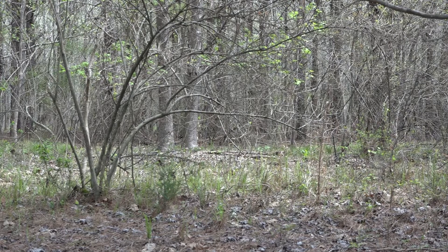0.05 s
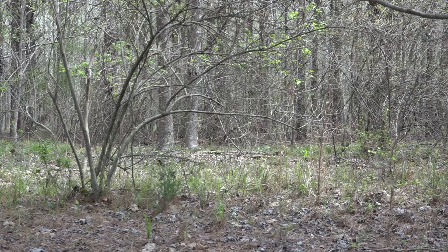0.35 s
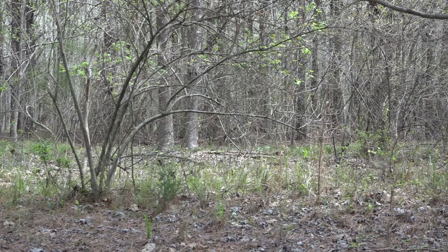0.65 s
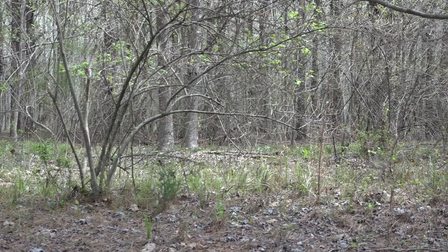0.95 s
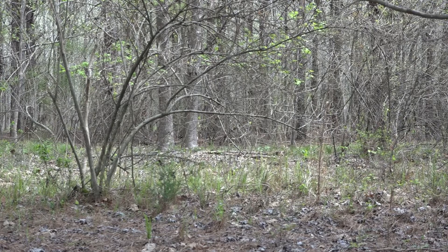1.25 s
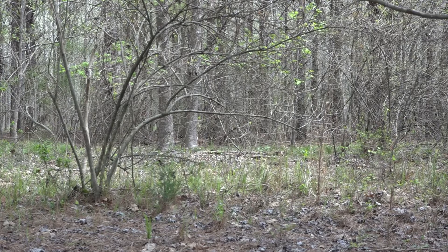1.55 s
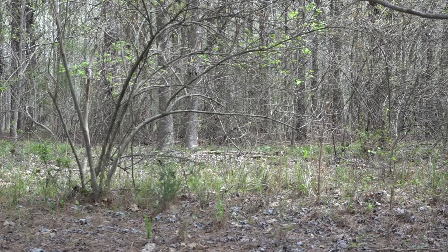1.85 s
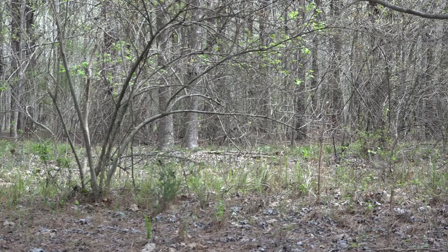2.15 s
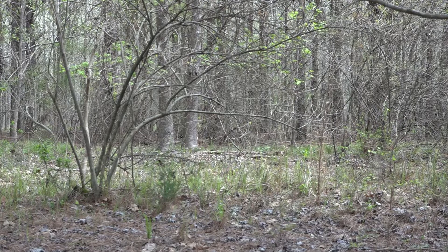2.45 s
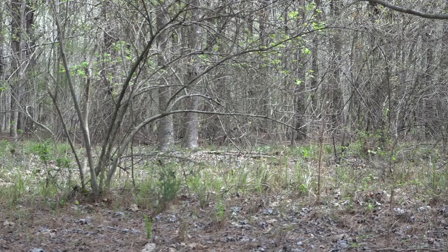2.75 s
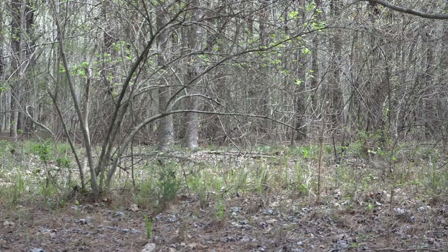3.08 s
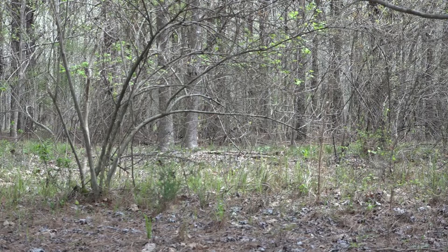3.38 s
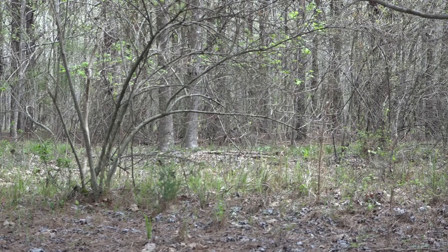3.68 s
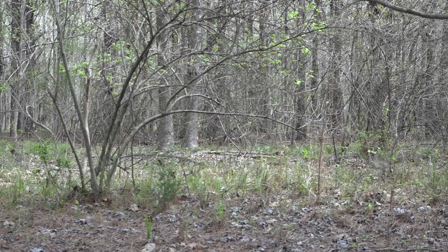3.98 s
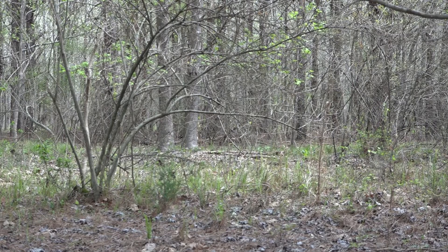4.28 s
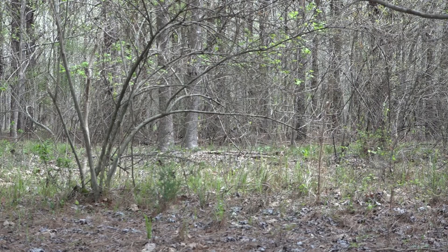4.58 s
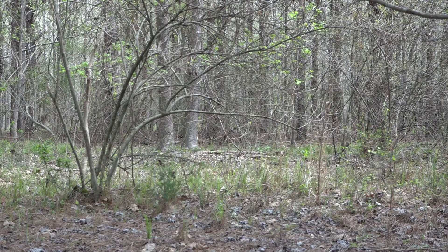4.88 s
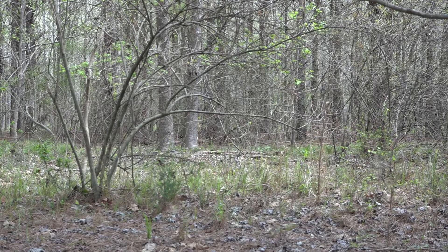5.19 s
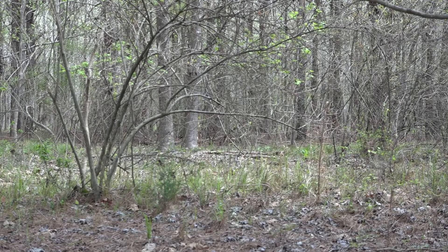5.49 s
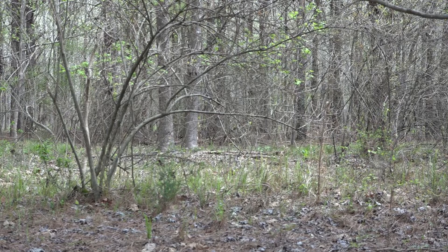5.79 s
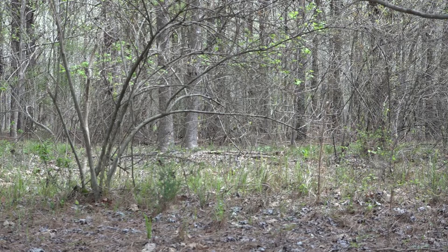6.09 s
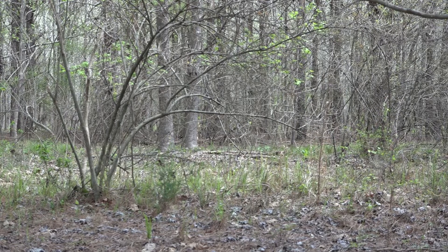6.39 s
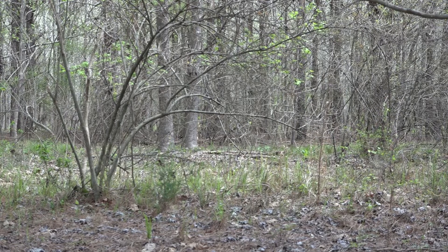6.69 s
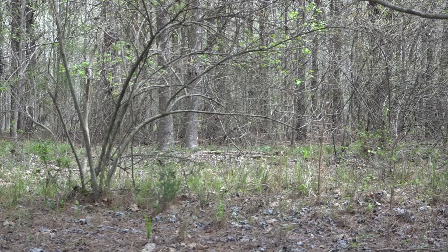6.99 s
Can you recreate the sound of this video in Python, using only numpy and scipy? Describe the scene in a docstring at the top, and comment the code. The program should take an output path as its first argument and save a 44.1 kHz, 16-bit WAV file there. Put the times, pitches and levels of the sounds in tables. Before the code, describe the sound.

In quiet woods with a soft, steady low rumble, a slowing run of seven loud turkey clucks sounds nearby, over faint nasal bird notes and small high chirps. The clucks stop and only distant whistles remain. Then soft steps in dry leaf litter build into crisp rustling and snapping, much quieter than the turkey, joined by a faint two-note bird call repeated four times.

```python
"""A wild turkey close by in spring woods opens with a slowing run of seven sharp clucks, each a quick
dip in syrinx pitch shaped by throat and beak. Behind it a bird whines thinly and songbirds slur, chip
and whistle; the trunks scatter the calls. Later dry leaves rustle and crackle more and more as something
walks through them, and a far bird repeats two notes. Distant air rumbles low throughout."""
import sys
import numpy as np
from scipy import signal
from scipy.fft import rfft, irfft
from scipy.io import wavfile
from scipy.ndimage import uniform_filter1d

SR = 44100
rng = np.random.default_rng(int(sys.argv[2]) if len(sys.argv) > 2 else 0)


def to_wav(sig):
    """Store sig (one row per channel, or 1-D mono) as 16-bit WAV at the path in sys.argv[1].

    Samples outside -1..1 are clipped; the rate is SR.
    """
    pcm = np.clip(np.atleast_2d(sig), -1, 1) * 32767
    pcm = np.round(pcm).astype(np.int16)
    wavfile.write(sys.argv[1], SR, pcm.T)  # frames by channels


N = 319284
TIME_S = np.arange(N) / SR
TOP_HZ = 16100

# (time [s], length [s], lowest pitch [Hz], level [dB], gain of all harmonics but the 2nd [dB], rasp [0-1])
TURKEY_CLUCKS = [(0.175, 0.036, 857, -35, -0.5, 0.13), (0.3967, 0.04, 721.4, -26, 3, 0.33),
                 (0.6739, 0.04, 644.4, -26.5, 2, 0.55), (1.02, .0436, 671, -26, 3, 0.4),
                 (1.451, .0417, 643.4, -23.5, 3, 0.46), (1.9577, 0.041, 643, -23, 2, 0.38),
                 (2.5753, 0.042, 670, -24, 3.5, 0.9)]
# throat and beak response: (frequency [Hz], gain [dB])
THROAT_EQ = [(300, -53), (520, -25), (680, -12.5), (860, -16.5), (1060, -4), (1350, -6), (1520, -1.5),
             (1700, 7), (1950, -7), (2150, -15), (2500, -38), (2760, -18), (3300, -38.5), (3850, -37.5),
             (4550, -28), (5500, -41), (6800, -35), (8800, -53), (10500, -48), (14000, -90)]


def turkey(closing_hz=1792, jitter=0.022, shimmer=0.15, edge_hz=3400, rasp_db=-21, low_cut_hz=490):
    """The syrinx pitch dips and snaps upward, sweeping its harmonics through the throat resonances."""
    out = np.zeros(N)
    k = np.arange(1, 18)[:, None]
    for start_s, length_s, low_hz, db, harmonic_db, rasp in TURKEY_CLUCKS:
        u = np.linspace(0, 1, int(length_s * SR))
        reach = min(0.395 + 2 * max(rasp - 0.1, 0), 1)  # a clean cluck bends less
        hz = low_hz + reach * (closing_hz - low_hz) * cluck_bend(u)
        hz *= 1 + jitter * rasp * walk(900, len(u))
        phase = 2 * np.pi * np.cumsum(hz) / SR
        partials = gain_at(k * hz, THROAT_EQ) * undb(harmonic_db * (k != 2)) * (k * hz < TOP_HZ)
        flutter_depth = shimmer * rasp * (1 + (k * hz / edge_hz) ** 2).clip(0, 7)
        flutter = flutter_depth * np.array([walk(617, len(u)) for _ in k])
        voice = np.sum(partials * (1 + flutter) * np.sin(k * phase), axis=0)
        hiss = unit(colour(rng.standard_normal(len(u)), THROAT_EQ)) * (1 + np.cos(phase))
        envelope = undb(db) * cluck_envelope(u, length_s)
        add(out, start_s, (voice + rasp * undb(rasp_db) * hiss) * envelope)
    # the clucks carry almost nothing below their fundamental
    return signal.sosfilt(signal.butter(5, low_cut_hz, "highpass", fs=SR, output="sos"), out)


def cluck_bend(u):
    """Pitch rise over cluck progress u (0-1): sink, rest, snap upward."""
    sink = np.cos(np.pi / 2 * np.clip(u / 0.35, 0, 1)) ** 2
    snap = np.sin(np.pi / 2 * np.clip((u - 0.45) / 0.65, 0, 1)) ** 2
    return 0.26 * sink + snap


def cluck_envelope(u, length_s, attack_s=0.014, hold_share=0.61, hold_db=0.5, fade_db_per_s=1378):
    """Quick attack, hold, then a steady fade as the pitch snaps up."""
    attack = np.sin(np.pi / 2 * np.clip(u * length_s / attack_s, 0, 1)) ** 1.42
    fading_s = length_s * np.maximum(u - hold_share, 0)
    return attack * undb(hold_db - fade_db_per_s * fading_s) * signal.windows.tukey(len(u), 0.08)


# (time [s], level [dB])
RUSTLE_LEVELS = [(0, -78.5), (3.8, -80.5), (4.15, -70.5), (4.5, -80), (5.2, -72.5), (5.55, -70), (5.9, -69),
                 (6.2, -65), (6.45, -64.5), (6.75, -59.5), (6.87, -64.5), (6.97, -58.5), (7.06, -65),
                 (7.24, -68)]
# (frequency [Hz], gain [dB])
RUSTLE_EQ = [(1500, -27), (3000, -3.5), (4500, -3), (7000, 1.5), (10000, -1), (12500, -2.5), (16000, -9.5)]


def leaves(snaps_per_s=900, spread_db=1.5, hiss_db=-11, flicker_db=1.85):
    """Dry leaves give way in dense tiny snaps, a sliding hiss and occasional cracks."""
    snaps = (rng.random(N) < snaps_per_s / SR) * rng.standard_normal(N)
    snaps *= undb(spread_db * rng.exponential(size=N).clip(0, 4))
    litter = colour(unit(snaps) + undb(hiss_db) * rng.standard_normal(N), RUSTLE_EQ)
    rustle_db = np.interp(TIME_S, *np.transpose(RUSTLE_LEVELS))
    rustle = unit(litter) * undb(rustle_db + flicker_db * walk(35, N))
    return rustle + cracks(rustle_db)


# (time [s], relative level [dB])
LOUD_CRACKS = [(0.3316, -36), (0.3377, -32.5), (0.555, -42.5), (.829, -38.5), (1.782, -44), (2.2144, -47.5),
               (3.174, -45), (5, -47), (5.961, -37), (6.3482, -34), (6.4899, -31.5), (6.616, -33),
               (6.775, -36.5), (6.8926, -28), (6.9192, -26), (6.9405, -32), (6.984, -34.5), (7.0499, -42),
               (7.0916, -34.5), (7.2, -37)]
# (frequency [Hz], gain [dB])
CRACK_EQ = [(600, -20), (2200, -24), (3900, -5.5), (5500, -6), (9000, -1), (12000, -2), (16000, -14)]


def cracks(rustle_db, rise_s=0.00025, fade_s=0.002, crumble_s=0.0088, crumble_db=-19, gain_db=-2.5):
    """Leaves and twigs crack in a noise burst, then crumble in a weaker tail."""
    bursts, t = np.zeros(N), TIME_S[:2048]
    attack = 1 - np.exp(-t / rise_s)
    decay = np.exp(-t / fade_s) + undb(crumble_db) * np.exp(-t / crumble_s)
    for start_s, db in LOUD_CRACKS + small_cracks(rustle_db):
        add(bursts, start_s, undb(db + gain_db) * attack * decay)
    return colour(bursts * rng.standard_normal(N), CRACK_EQ)


def small_cracks(rustle_db, busy_db=-69, busy_rate_per_s=17, base_db=-46.5, spread_db=2, tries=300):
    """Chance cracks, denser and louder as the rustle grows: (time [s], relative level [dB])."""
    when, luck = rng.random((tries, 2)).T
    effort_db = rustle_db[(when * N).astype(int)] - busy_db
    rate_per_s = busy_rate_per_s * undb(0.93 * effort_db)
    happens = luck < rate_per_s * N / SR / tries
    db = base_db + 0.25 * effort_db + spread_db * rng.standard_normal(tries)
    return list(zip(when[happens] * N / SR, db[happens]))


# (time [s], level [dB])
FOOTFALLS = [(1.175, -57), (2.405, -54), (5.0, -55.5), (5.11, -56), (5.185, -65), (5.962, -52.5),
             (6.048, -50.5), (6.44, -58), (6.56, -57)]
# (frequency [Hz], gain [dB])
FOOTFALL_EQ = [(80, -21), (230, 4.5), (400, -8), (700, 1), (1200, -6.5), (1900, -10), (5000, -9),
               (9000, -18.5)]
# (frequency [Hz], gain [dB])
SHUFFLE_EQ = [(90, -6), (240, 2), (400, -8.5), (600, -5), (1000, -17), (1600, -19), (3000, -21)]


def treads(fade_s=0.0072, shuffle_db=-75, uneven_db=3, shuffle_from_s=4.9):
    """Dull crunches of litter pressed into the soil, over an uneven shuffle."""
    shuffle = unit(colour(rng.standard_normal(N), SHUFFLE_EQ))
    shuffle *= undb(shuffle_db + uneven_db * walk(22, N))
    out = shuffle * np.clip((TIME_S - shuffle_from_s) / 0.11, 0, 1)
    t = TIME_S[:4096]
    for start_s, db in FOOTFALLS:
        crunch = unit(colour(rng.standard_normal(len(t)), FOOTFALL_EQ))
        add(out, start_s, undb(db) * crunch * np.exp(-t / fade_s))
    return out


# (time [s], length [s], knee [Hz], final pitch [Hz], level [dB], pitch waver [ratio])
FALLING_SLURS = [(0.016, 0.045, 3600, 2930, -57, .02), (0.533, .062, 3970, 2810, -49.5, 0.016),
                 (1.379, 0.025, 3220, 2460, -58.5, 0.097), (1.746, 0.029, 3180, 2490, -57.5, 0.09),
                 (2.128, 0.0248, 3120, 2480, -57.5, 0.062), (2.51, 0.026, 3220, 2440, -56, 0.096)]
# (time [s], target pitch [Hz], level [dB])
RISING_BUZZES = [(0.407, 5290, -51), (3.213, 5650, -63.5), (6.087, 5230, -49.5), (6.704, 5130, -50)]
# (time [s], first note level [dB])
TWO_NOTE_CALLS = [(6.079, -68.5), (6.256, -61.5), (6.427, -63.5), (6.601, -63)]
# (time [s], length [s], first pitch [Hz], target pitch [Hz], level [dB])
FAR_WHISTLES = [(0.602, 0.054, 2360, 2970, -59), (3.657, 0.156, 2575, 2450, -72),
                (4.58, .24, 2500, 2400, -78), (4.76, 0.21, 2570, 1544, -77), (5.305, 0.07, 4540, 3180, -67),
                (5.439, 0.096, 2500, 1807, -71.5)]


def songbirds(slur_top_hz=6540, slur_fade_db=4, note_step_s=0.0622, stress_db=2.5):
    """Gliding tones: slurs and chips that plunge then sag, buzzes, two-note calls, faint whistles."""
    out = np.zeros(N)
    for start_s, length_s, knee_hz, last_hz, db, waver in FALLING_SLURS:
        u = np.linspace(0, 1, int(length_s * SR))
        hz = glide(length_s, slur_top_hz, knee_hz, glide_s=0.0028) + (last_hz - knee_hz) * u
        add(out, start_s, whistle(hz, db + slur_fade_db * (0.5 - u), waver, taper=0.25))
    for start_s, target_hz, db in RISING_BUZZES:
        hz = glide(length_s=0.025, first_hz=4385, target_hz=target_hz, glide_s=0.0079)
        add(out, start_s, whistle(hz, db, waver=0.094))
    for start_s, db in TWO_NOTE_CALLS:
        low_hz = glide(length_s=0.044, first_hz=2453, target_hz=2260, glide_s=0.0304)
        high_hz = glide(length_s=0.044, first_hz=2453, target_hz=2417, glide_s=0.0304)
        add(out, start_s, whistle(low_hz, db, waver=0.0088))
        add(out, start_s + note_step_s, whistle(high_hz, db + stress_db, waver=0.0074))
    for start_s, length_s, first_hz, target_hz, db in FAR_WHISTLES:
        hz = glide(length_s, first_hz, target_hz, glide_s=0.72 * length_s)
        add(out, start_s, whistle(hz, db, waver=0.018))
    return out


def glide(length_s, first_hz, target_hz, glide_s):
    """Pitch that moves quickly at first, then settles."""
    return target_hz + (first_hz - target_hz) * np.exp(-TIME_S[:int(length_s * SR)] / glide_s)


def whistle(hz, db, waver, taper=0.47, flicker_db=2):
    """One songbird note: a sine trembling in pitch and level."""
    size = len(hz)
    phase = 2 * np.pi * np.cumsum(hz * (1 + waver * walk(900, size))) / SR
    envelope = undb(db + flicker_db * walk(250, size)) * signal.windows.tukey(size, taper)
    return envelope * np.sin(phase)


# (crest time [s], crest pitch [Hz], level [dB], relative 4th harmonic [dB])
WHINE_NOTES = [(0.261, 1760, -68.5, -23), (.735, 1874, -65.5, -11), (1.224, 1975, -64, -2),
               (1.591, 1905, -63.5, -2), (1.961, 1910, -63, -1), (2.34, 1887, -62.5, -6.5),
               (2.736, 1887, -63.5, -3)]


def whining_bird(half_length_s=0.1, droop=0.27, bright_s=0.049, third_re_fourth_db=-17):
    """Arched nasal notes whose upper harmonics open only around the crest."""
    out = np.zeros(N)
    t = np.arange(-half_length_s, half_length_s, 1 / SR)
    arch = 1 - droop * np.abs(t / half_length_s) ** 1.8
    for crest_s, crest_hz, db, fourth_db in WHINE_NOTES:
        hz = crest_hz * (arch + 0.0035 * walk(250, len(t)))
        phase = 2 * np.pi * np.cumsum(hz) / SR
        upper = undb(fourth_db) * (np.sin(4 * phase) + undb(third_re_fourth_db) * np.sin(3 * phase))
        note = np.sin(phase) + upper * np.exp(-(t / bright_s) ** 2)
        envelope = undb(db + 2 * walk(68, len(t))) * signal.windows.tukey(len(t), 0.35)
        add(out, crest_s - half_length_s, note * envelope)
    return out


# (start [s], end [s], centre [Hz], width [Hz], level [dB])
CHORUS_BANDS = [(0, 0.45, 2430, 190, -70), (2.1, 3.3, 2386, 86, -74.5), (2, 7.24, 2490, 89, -84),
                (.7, 1.37, 5850, 1100, -75.5), (1.3, 2.11, 6500, 1900, -75.5),
                (3.85, 4.45, 3430, 1200, -78.5), (6.25, 7.24, 1470, 260, -81),
                (-0.5, 5.6, 9420, 1000, -82.5)]


def chorus(waver_db=1.5, fade_s=0.07):
    """Far birds and insects, blurred by the woods into wavering noise bands."""
    out = np.zeros(N)
    for start_s, end_s, centre_hz, width_hz, db in CHORUS_BANDS:
        size = int((end_s - start_s) * SR)
        band = np.exp(-2 * ((np.fft.rfftfreq(size, 1 / SR) - centre_hz) / width_hz) ** 2)
        blur = unit(irfft(rfft(rng.standard_normal(size)) * band, size))
        fade = signal.windows.tukey(size, min(2 * fade_s / (end_s - start_s), 1))
        add(out, start_s, blur * undb(db + waver_db * walk(20, size)) * fade)
    return out


# trunk reflection: (frequency [Hz], gain [dB])
TRUNK_EQ = [(500, -2), (1000, -37.5), (1400, 7.5), (1800, -18.5), (2500, 2), (5000, -6), (12000, 11)]


def trunk_echo(x):
    """The trunks send back a long, coloured tail."""
    return scatter(colour(x, TRUNK_EQ), db=-20.5, t60_s=1.0, onset_s=0.0081, width=0.13)


def scatter(x, db, t60_s, onset_s, width):
    """Countless weak echoes from trunks and ground, in stereo."""
    t = TIME_S[:SR * 2]
    envelope = undb(-60 * t / t60_s) * (1 - np.exp(-(t / onset_s) ** 4))
    mid, side = rng.standard_normal((2, len(t))) * envelope
    echoes = (mid + width * side * np.array([[1], [-1]])) / np.sqrt(np.sum(mid ** 2))
    return undb(db) * signal.fftconvolve(x[None], echoes, axes=1)[:, :N]


# (frequency [Hz], gain [dB])
AIR_EQ = [(12, -24), (20, 0.5), (77, 0.5), (172, -11), (234, -18), (347, -20), (485, -22), (1030, -21.5),
          (1190, -28), (1910, -28.5), (2530, -26), (3740, -29.5), (6910, -34), (9670, -38), (16000, -45)]
# (frequency [Hz], side minus mid [dB])
AIR_SIDE_EQ = [(40, -36), (110, -29), (200, -8.5), (380, -2), (1200, 0.5), (2400, -1.5), (8000, -3),
               (14000, 3.5)]


def air(mid_db=-60.96):
    """Steady distant rumble, alike in both channels, with a faint wide hiss."""
    mid, side = colour(rng.standard_normal((2, N)), AIR_EQ)
    stereo = mid + colour(side, AIR_SIDE_EQ) * np.array([[1], [-1]])
    return stereo / np.std(mid) * undb(mid_db)


def place(x, pan_db, lead_us, shadow_hz=1150):
    """Two close microphone ports: the left leads and, above the bass, is louder by pan_db."""
    hz = np.fft.rfftfreq(N, 1 / SR)
    shade = undb(pan_db / 2 * (1 - np.exp(-(hz / shadow_hz) ** 2)))
    lag = np.exp(-2j * np.pi * hz * lead_us / 1e6)
    return irfft(rfft(x) * np.array([shade, lag / shade]), N)


def port_cavity(stereo, centre_hz=1461, width_hz=48.5):
    """The right port's cavity delays that channel around its resonance, at unchanged level."""
    left, right = stereo
    s = 1j * np.fft.rfftfreq(N, 1 / SR) / centre_hz
    damping = width_hz / centre_hz
    allpass = (s * s - damping * s + 1) / (s * s + damping * s + 1)
    return np.array([left, irfft(rfft(right) * allpass, N)])


def undb(db):
    """Decibels to gain."""
    return 10 ** (np.asarray(db) / 20)


def unit(x):
    """Scale to rms 1."""
    return x / np.sqrt(np.mean(x ** 2))


def gain_at(hz, eq):
    """Gain of an EQ table, interpolated in log frequency."""
    knots_hz, db = np.transpose(eq)
    return undb(np.interp(np.log(np.maximum(hz, 1)), np.log(knots_hz), db))


def colour(x, eq):
    """Filter by an EQ table."""
    size = x.shape[-1]
    return irfft(rfft(x) * gain_at(np.fft.rfftfreq(size, 1 / SR), eq), size)


def walk(rate_hz, size):
    """Smooth random wander with a spread near 1."""
    hold = max(int(SR / rate_hz), 1)
    steps = np.repeat(rng.standard_normal(size // hold + 1), hold)
    return 1.3 * uniform_filter1d(uniform_filter1d(steps, hold), hold)[:size]


def add(track, start_s, x):
    """Mix x into track; a negative start moves to 0."""
    i = max(int(start_s * SR), 0)
    track[i:i + len(x)] += x[:max(N - i, 0)]


def scene(bounce_s=0.0039, bounce_db=-21.5):
    """The near turkey is almost dry; the farther birds carry more of the woods."""
    clucks, whines, song = turkey(), whining_bird(), songbirds()
    bounce = -undb(bounce_db) * np.interp(TIME_S - bounce_s, TIME_S, clucks)  # soft ground inverts it
    near = place(clucks + bounce, pan_db=2.5, lead_us=9.9)
    near += scatter(clucks, db=-21.5, t60_s=0.084, onset_s=0.001, width=0.8)
    woods = trunk_echo(clucks)
    birds = place(whines + song + chorus(), pan_db=0.5, lead_us=0)
    birds += scatter(song, db=-4, t60_s=0.74, onset_s=0.0022, width=0.12)
    birds += scatter(whines, db=-2.5, t60_s=0.73, onset_s=0.0076, width=0.26)
    litter = leaves() + treads()
    ground = place(litter, pan_db=0, lead_us=22.4)
    ground += scatter(litter, db=-10, t60_s=0.22, onset_s=0.0024, width=0.55)
    return port_cavity(near + woods + birds + ground) + air()


def record(dry):
    """Steep low-pass at TOP_HZ."""
    return signal.sosfilt(signal.ellip(10, 0.2, 70, TOP_HZ, fs=SR, output="sos"), dry)


dry = scene()
out = record(dry)
to_wav(out)
```